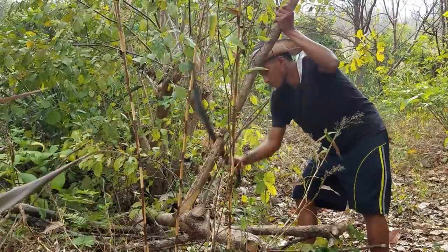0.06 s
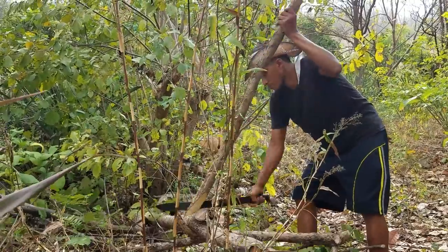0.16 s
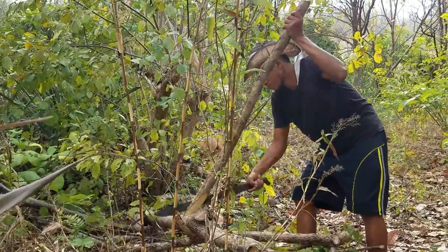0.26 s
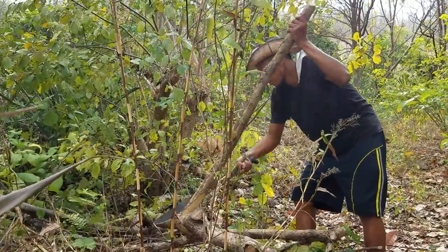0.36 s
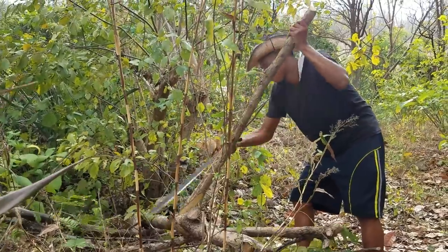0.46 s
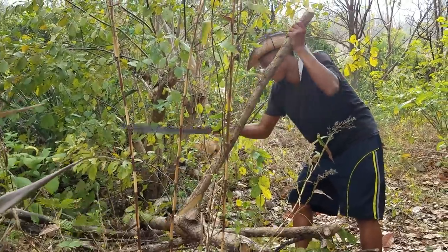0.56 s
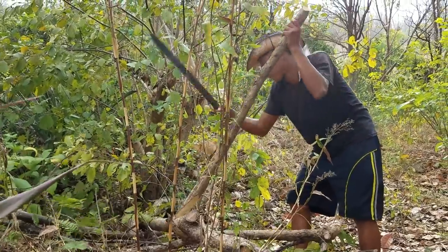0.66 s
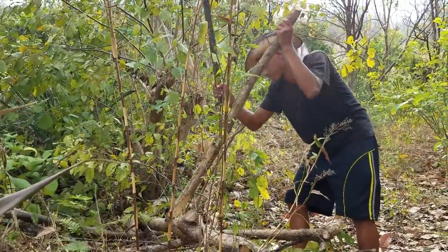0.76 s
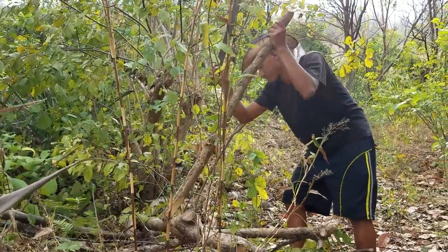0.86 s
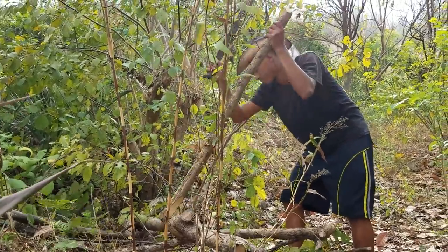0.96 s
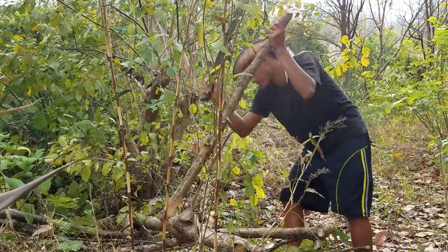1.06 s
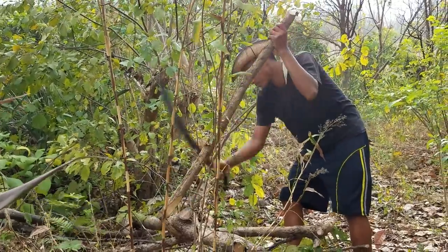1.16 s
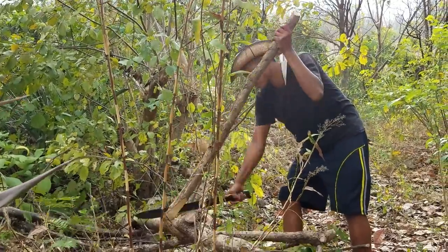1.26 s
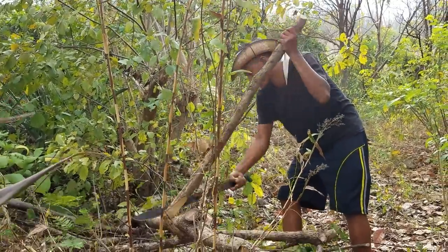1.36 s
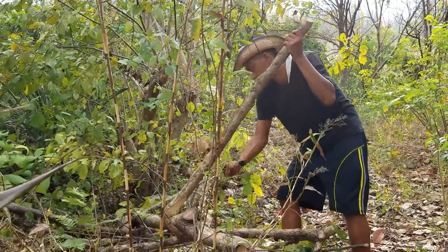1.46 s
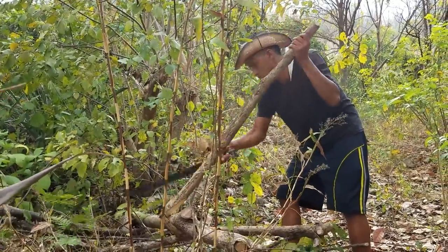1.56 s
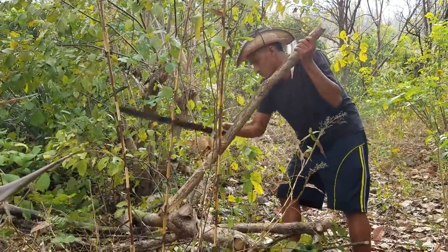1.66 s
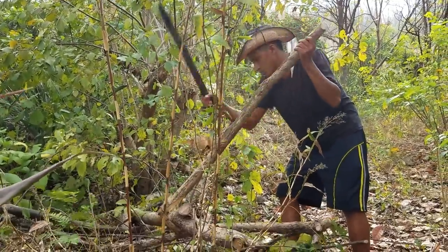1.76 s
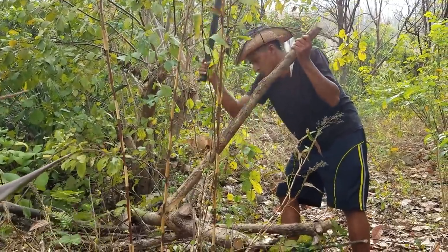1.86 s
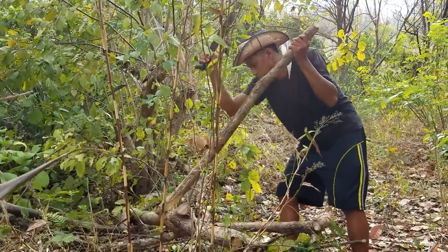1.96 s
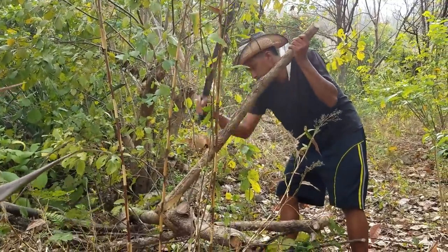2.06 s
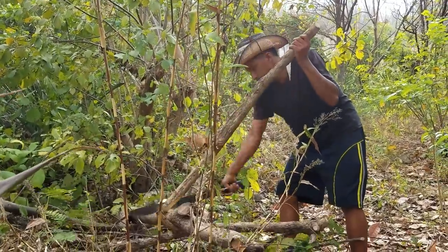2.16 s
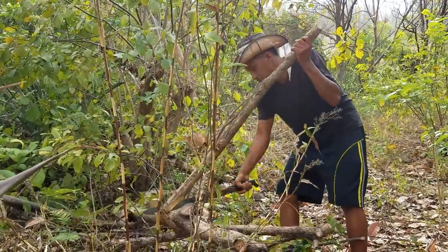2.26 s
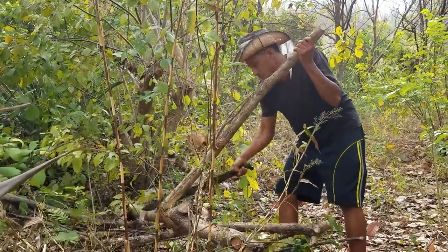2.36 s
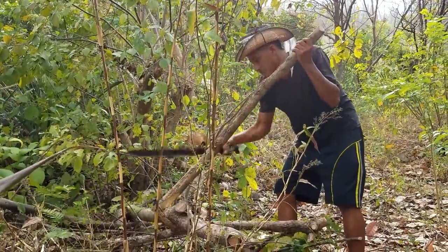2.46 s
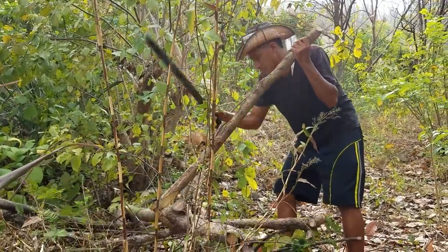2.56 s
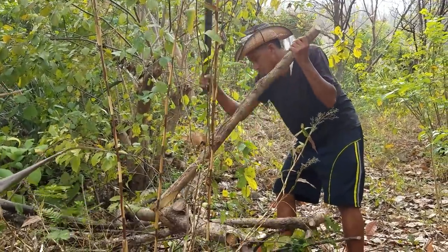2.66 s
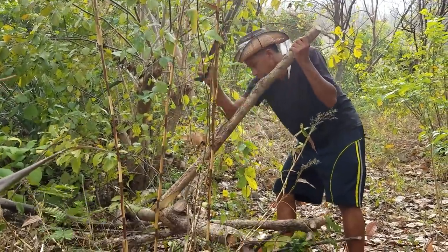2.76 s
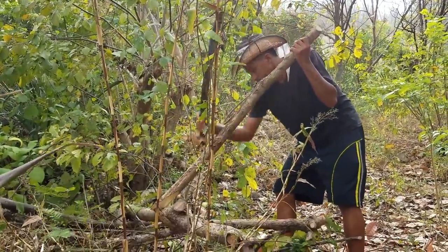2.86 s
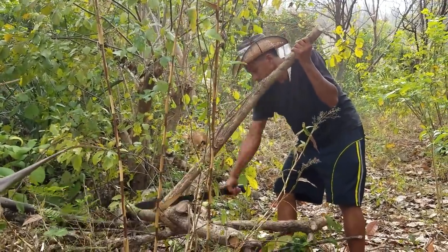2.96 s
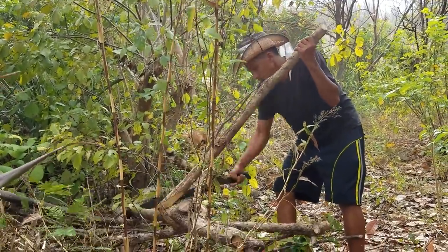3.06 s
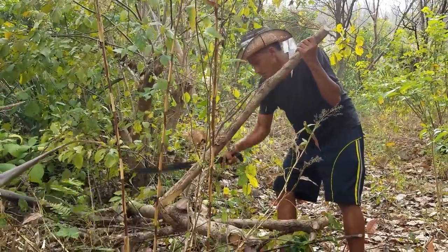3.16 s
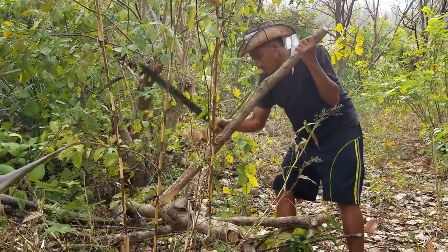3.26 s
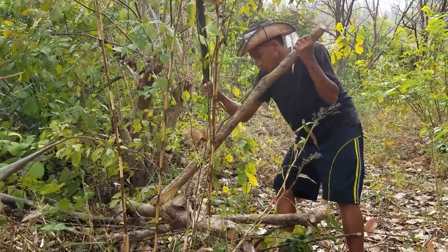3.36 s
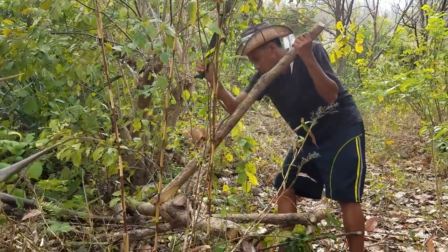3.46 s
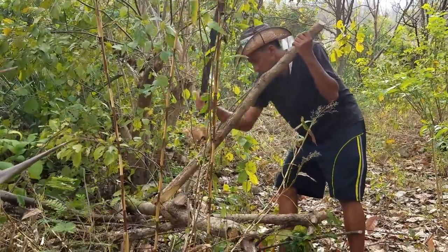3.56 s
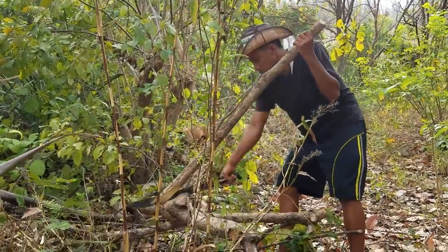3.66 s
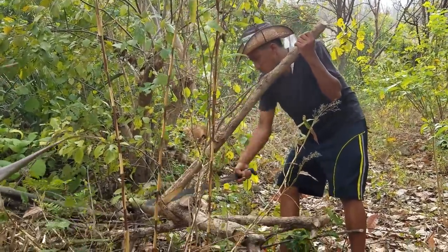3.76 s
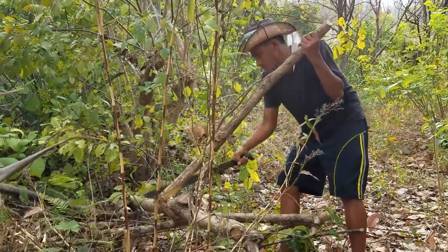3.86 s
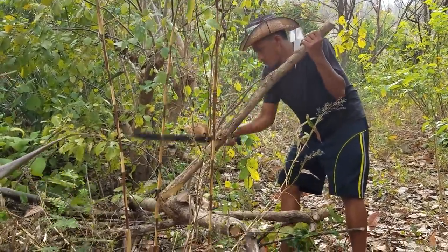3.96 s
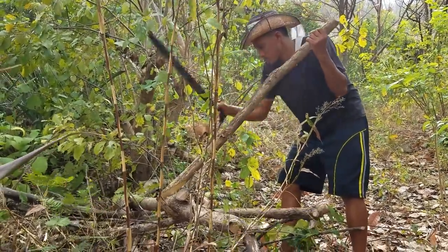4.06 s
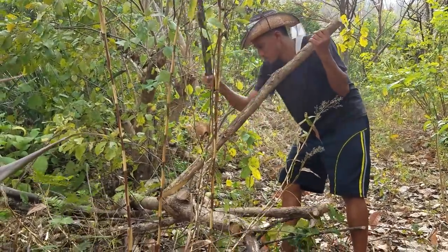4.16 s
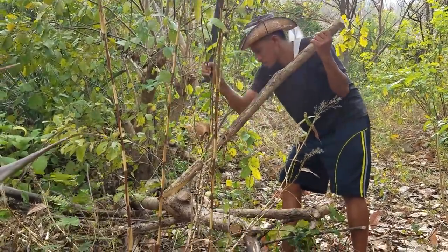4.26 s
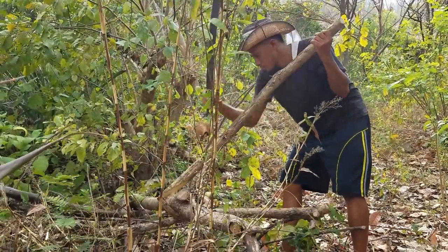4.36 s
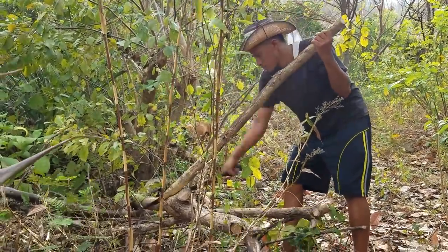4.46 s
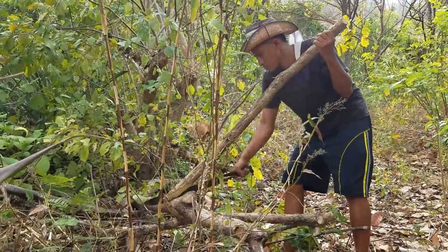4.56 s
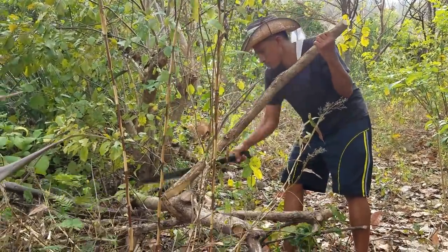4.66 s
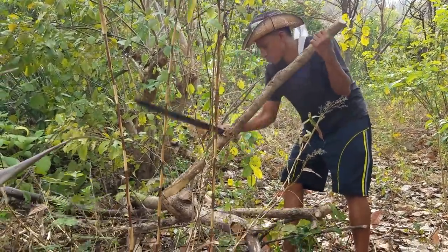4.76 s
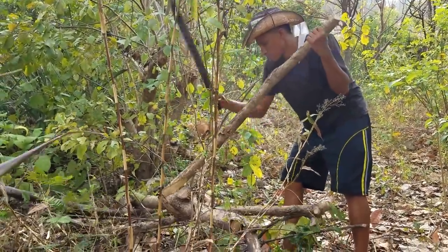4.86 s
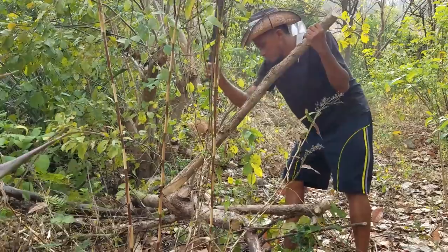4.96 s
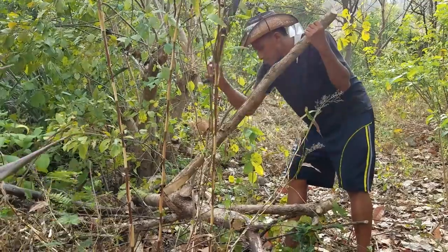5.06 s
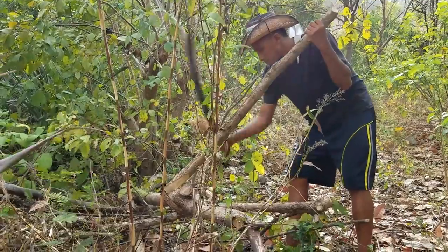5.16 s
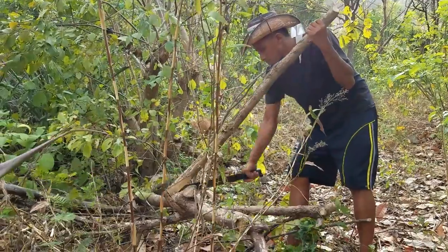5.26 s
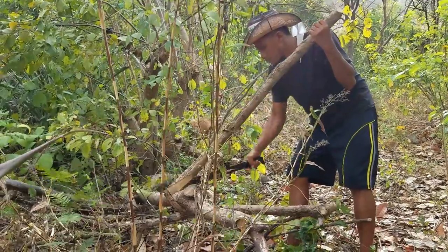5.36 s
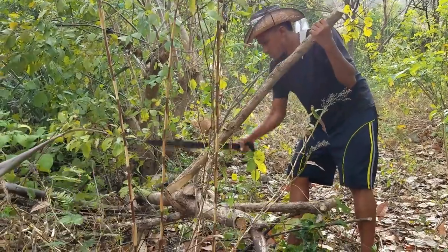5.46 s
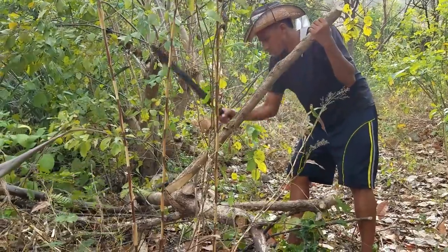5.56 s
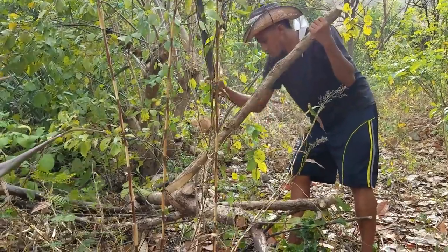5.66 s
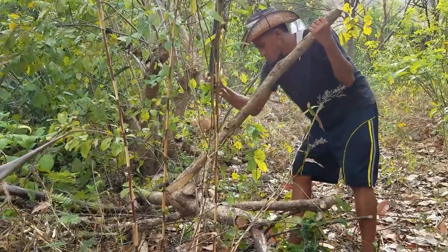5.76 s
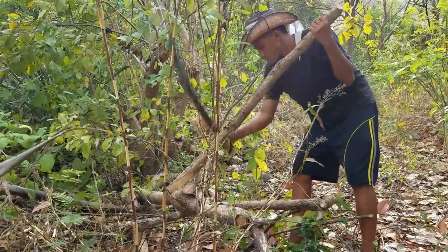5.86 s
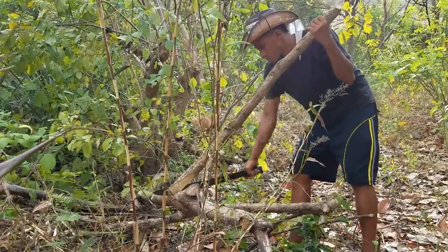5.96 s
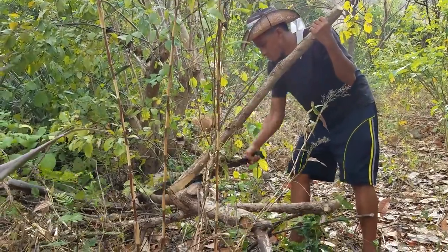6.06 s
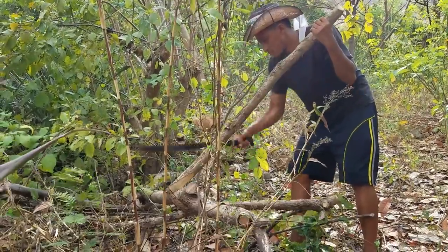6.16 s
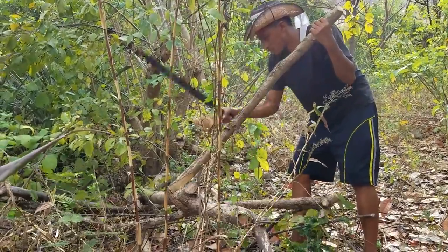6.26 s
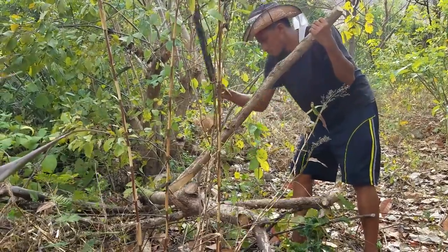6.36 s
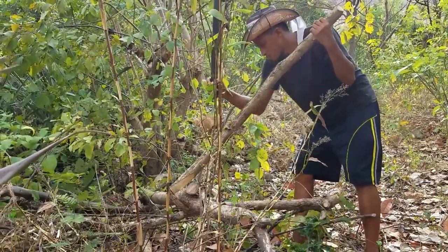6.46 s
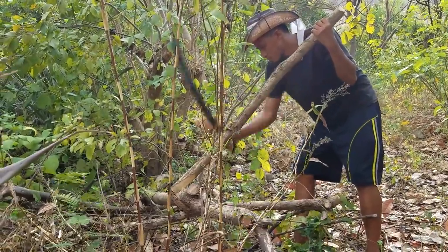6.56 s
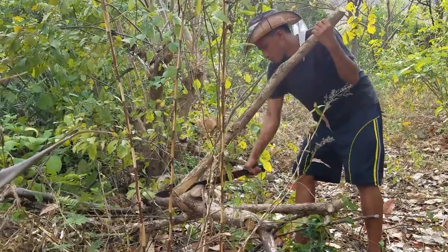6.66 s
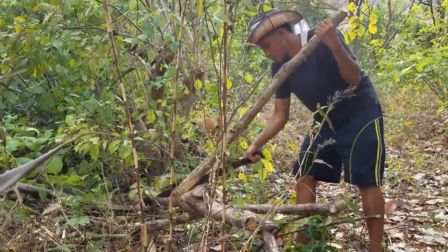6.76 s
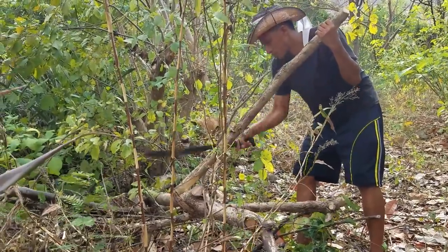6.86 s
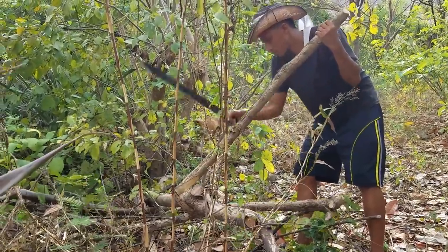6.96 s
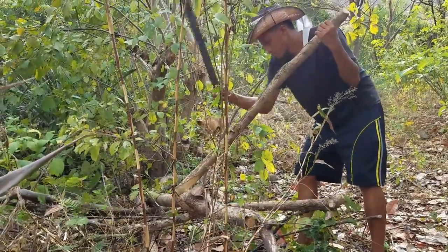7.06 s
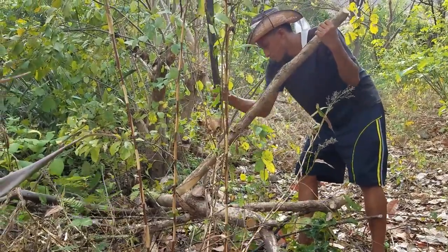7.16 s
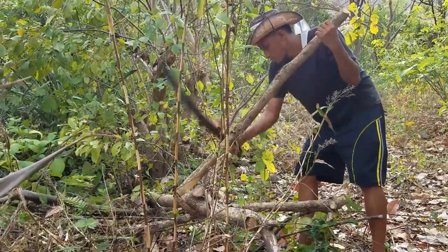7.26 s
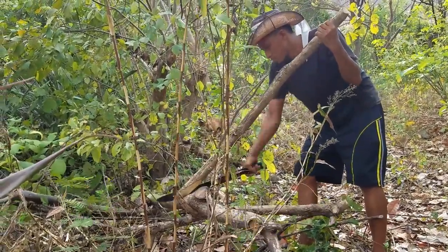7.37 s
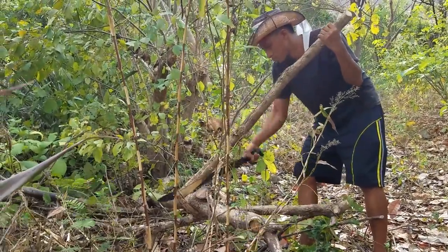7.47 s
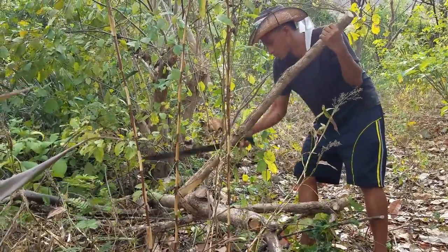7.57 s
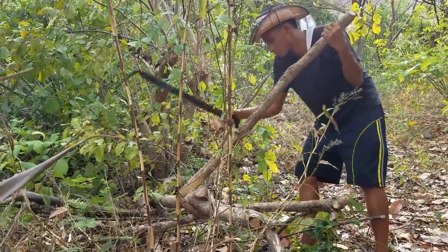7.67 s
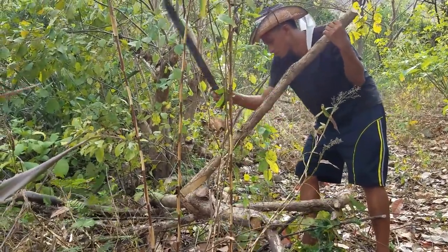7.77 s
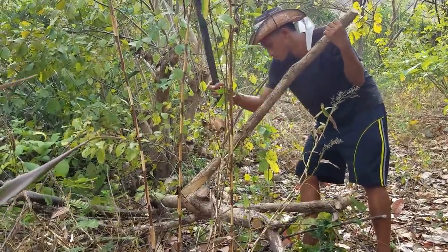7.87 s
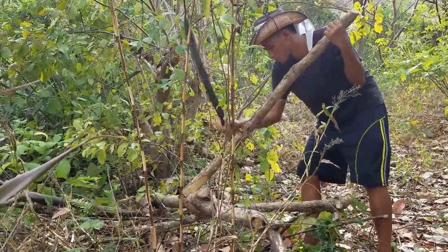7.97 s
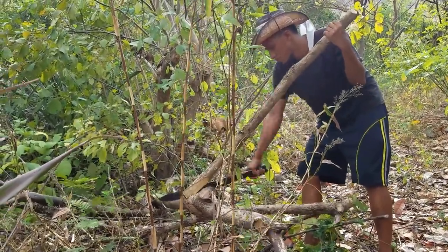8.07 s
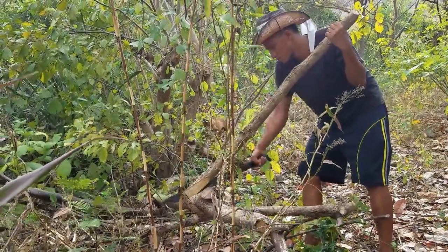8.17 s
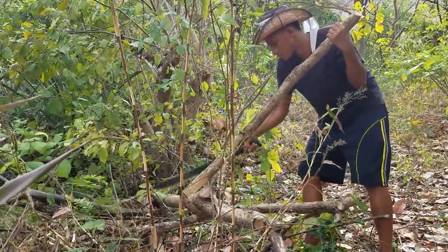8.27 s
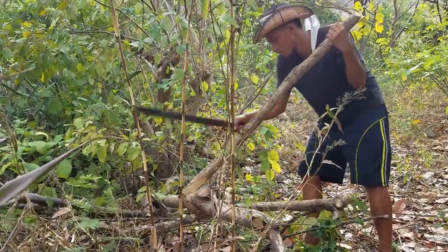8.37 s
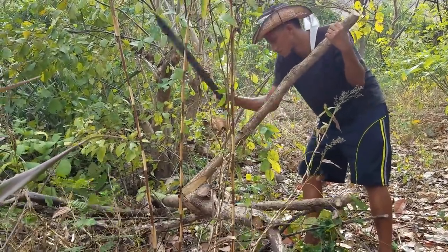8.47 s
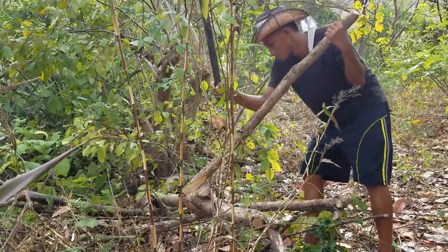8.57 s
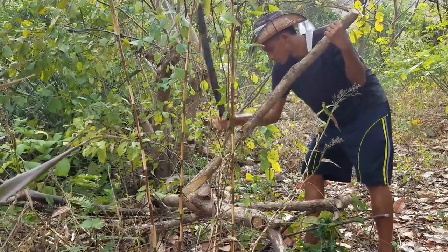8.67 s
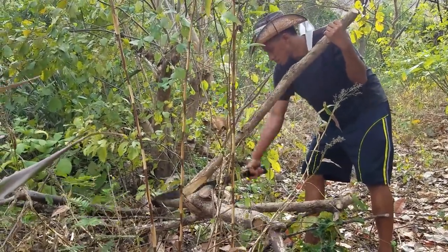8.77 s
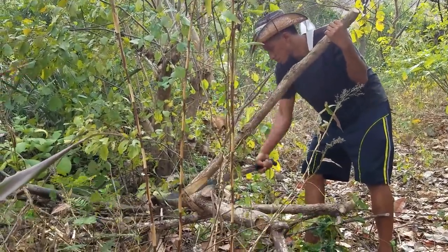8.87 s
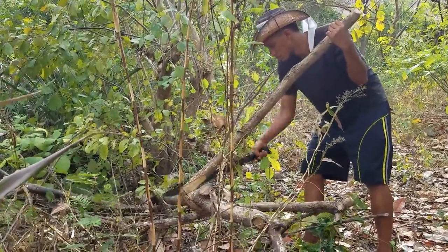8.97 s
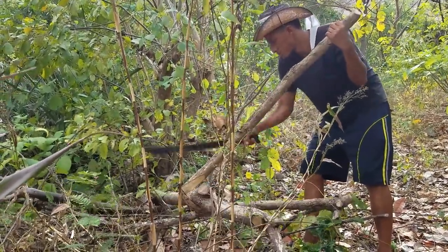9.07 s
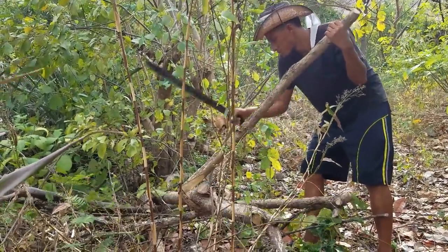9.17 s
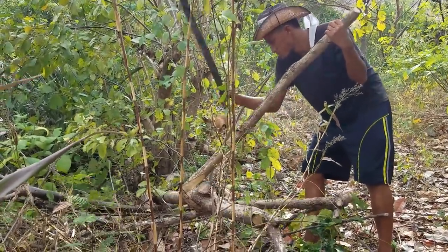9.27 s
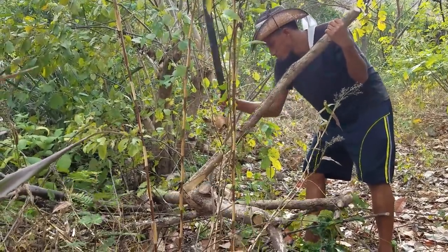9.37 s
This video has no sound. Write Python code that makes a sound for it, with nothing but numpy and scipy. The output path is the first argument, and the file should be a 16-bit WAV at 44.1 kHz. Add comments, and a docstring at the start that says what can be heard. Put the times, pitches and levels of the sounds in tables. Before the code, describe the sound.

Outdoors in dry woodland, a machete chops a leaning wooden pole twelve times, a little over once a second at first, then faster. Each close blow is a sharp, fibrous crack with a short hollow knock. Splinters snap and chips tick into dry leaves; the blade faintly rings a few times. A soft dove coos throughout, and small birds whistle in the second half over a quiet hush and soft forest echoes.

```python
"""Machete carving a pole in woodland

Twelve blows point a leaning wooden pole: each grazes, tears fibres (shaped noise) and rings the pole (sine modes).
Splinters crack, chips drop into dry leaves (noise bursts, random clicks) and the blade rings at three touches.
A dove and two songbirds call (gliding sines) over a steady hush and faint rumble (filtered noise).
Stems scatter the sound; far trees return a noise tail with two soft echoes.
"""
import sys
import numpy as np
from scipy import signal
from scipy.io import wavfile

SR = 44100
rng = np.random.default_rng(int(sys.argv[2]) if len(sys.argv) > 2 else 0)


def master_out(mix):
    """Clip the mix to full scale and print it as 16-bit PCM to the path in sys.argv[1]."""
    frames = np.transpose(np.atleast_2d(mix))
    ceiling = np.clip(frames, -1, 1)
    pcm = np.round(ceiling * 32767).astype(np.int16)
    wavfile.write(sys.argv[1], SR, pcm)


N = 414981

# blows: (time [s], time in wood [s], graze before bite [s], knock [Hz], strength [dB],
# brightness [dB/octave], hollow ring [dB], leaves shaken [dB])
CHOPS = [(0.0935, 0.0043, 0.00096, 1413, 1.5, 0, -6.5, -52), (1.1926, .0063, .001, 1520, 1, 0.35, -4, -50),
         (2.1474, 0.0058, .0015, 1270, 2, -.3, -2, -52.5), (2.9327, 0.0068, .001, 1142, 0, 0.56, 2, -56.5),
         (3.6529, .014, .0025, 1172, 1, -1.24, 8, -58), (4.4574, 0.0038, .0005, 1270, 1.5, 1, -1.5, -71),
         (5.2069, 0.006, .013, 1284, -1, -0.67, 2.5, -69),
         (5.9054, .02, 0.008, 1294, -3.5, -0.56, -2, -59.5), (6.604, .011, .002, 1200, -0.9, 0, -1.5, -70),
         (7.2976, .0098, .001, 1208, -.5, 0, -2, -62), (8.035, 0.0096, .0071, 1316, -6.5, -0.45, 1, -60),
         (8.742, .012, 0.0075, 1150, -5.5, 0, 0.5, -54)]
# pole bending modes, before detuning: (frequency [Hz], level [dB], t60 [s])
POLE_MODES = [(84, -47.5, 0.076), (113.4, -45.5, 0.22), (127.4, -46, 0.1), (174.4, -42.5, 0.15),
              (208.4, -36, .2), (235.5, -39.5, 0.32), (282, -34.5, 0.182), (342.4, -31.5, 0.18),
              (372, -32.5, 0.27), (421.6, -30.5, 0.15), (523.6, -27, 0.14), (574.8, -22, 0.13),
              (683.7, -22.5, 0.15), (752, -22, 0.075), (834, -25.5, 0.11), (1131, -34.5, 0.13),
              (1190, -28.5, 0.19), (1250, -30.5, .09), (1357, -28, .09), (1663, -32, 0.12),
              (2115, -28.5, 0.06), (2468, -29, 0.065), (3192, -26, 0.035)]
# tearing fibres: (frequency [Hz], level [dB])
TEAR_SPECTRUM = [(40, -33), (70, -25), (150, -19.5), (300, -13), (700, -7), (950, -14.5), (1400, -4.5),
                 (2200, -6.5), (3200, -8.5), (4800, -17), (7800, -21.5), (9200, -15), (12000, -20.5),
                 (16000, -28.5)]
# decay of the splitting wood: (frequency [Hz], t60 [s])
TEAR_DECAY = [(70, 0.15), (300, 0.32), (1000, 0.15), (3000, 0.076), (12000, 0.017)]
# loudest chips and twigs landing: (time [s], level [dB], clack [Hz], slide through leaves [s])
CHIP_LANDINGS = [(0.347, -25, 2920, 0.00013), (0.37, -32, 3540, 0.00047), (.412, -38.5, 1500, 0.019),
                 (.471, -30.5, 2590, 0.00069), (1.278, -23, 1900, 0.00065), (1.367, -28.5, 3170, 0.016),
                 (1.553, -39.5, 4700, 0.0044), (1.66, -47, 2780, 0.051), (1.76, -33.5, 1980, 0),
                 (1.972, -41, 1190, 0.003), (2.466, -33.5, 4000, 0), (3.146, -35.5, 2220, 0.00074),
                 (3.827, -33.5, 3700, 0), (3.909, -34, 1800, 0), (5.345, -27.5, 1224, 0.00063),
                 (6.82, -36, 2050, 0), (7.0245, -40, 2720, 0), (7.088, -36.5, 1890, 0),
                 (7.6445, -41, 4200, 0), (8.146, -31.5, 2210, 0.00063), (9.092, -31, 2000, 0),
                 (9.142, -28.5, 3450, 0)]
# glancing touches of the blade: (time [s], level [dB], favoured frequency [Hz])
BLADE_TOUCHES = [(.43, -47.5, 5140), (1.39, -51.5, 5400), (8.04, -39.5, 5700)]
# steel blade modes: (frequency [Hz], level re touch [dB], t60 [s])
BLADE_MODES = [(4549, -6, 0.47), (5187, 0.5, 0.33), (5663, -3, 0.55), (6083, -13, 0.31), (6460, -11, 0.35)]
# whistle harmonics: (multiple of fundamental, level [dB])
WHISTLE_HARMONICS = [(1, 2), (2, -3.5), (3, -2.5)]
# near scatter off foliage: (frequency [Hz], level re source [dB])
FOLIAGE_SCATTER = [(100, -20.5), (300, -14), (700, -4.5), (1500, -3.5), (3000, -3), (6000, -1.5),
                   (14000, 5.5)]
# near scatter off stems: (frequency [Hz], level re source [dB])
STEM_SCATTER = [(100, -17), (300, -20), (700, -11), (1500, -11.5), (3000, -6), (6000, -1.5), (14000, 2)]
# far forest tail: (frequency [Hz], relative level [dB])
FOREST_TAIL = [(100, -19.5), (600, -22.5), (1400, -15.5), (3000, -16.5), (6000, -13.5), (14000, -5)]
# colour of the far echoes: (frequency [Hz], relative level [dB])
ECHO_COLOUR = [(100, -12.5), (600, -14), (1500, -5.5), (3000, -5.5), (6000, -10), (14000, -16)]
# echoes from stands of trees: (delay [s], spread [s], level before colour [dB])
ECHOES = [(.345, 0.02, -25.5), (0.493, 0.021, -29)]
# channel correlation of diffuse sound, before any share: (frequency [Hz], correlation [0-1])
LIKENESS = [(100, 0.67), (500, 0.8), (1100, 0.25), (2000, 0.23), (3200, 0), (5000, 0), (16000, 0.03)]
# woodland air: (frequency [Hz], gain on white noise [dB])
AIR_SPECTRUM = [(25, -66), (60, -58), (130, -68), (320, -48), (700, -54.5), (1300, -55.5), (2200, -56),
                (4000, -62.5), (7500, -79), (9500, -61), (15500, -67.5)]
# deep bass over time, thinner after the fourth blow: (time [s], level [dB])
BASS = [(0, 9.5), (1.2, 13), (2.95, 13), (3.6, -2.5), (9.41, -3)]
# dove calls: (time [s], level [dB])
DOVE_CALLS = [(-.18, -62.5), (2.04, -58.5), (4.22, -61), (6.32, -60.5), (8.53, -59.5)]
# arch of each coo: (first [Hz], middle [Hz], last [Hz])
COO_HZ = (767, 781, 725)
# songbird notes before stretching: (time in phrase [s], length [s], first [Hz], middle [Hz], last [Hz], level [dB])
PHRASE = [(0, 0.079, 2080, 2430, 2430, -3), (.04, .09, 2580, 2087, 1600, 0.5),
          (0.371, 0.0575, 2420, 2840, 2780, 0.5), (.46, .085, 3220, 2580, 2190, -3),
          (0.591, .065, 2940, 2610, 2150, -6), (.695, .07, 2180, 1990, 1780, -9.5),
          (0.767, .068, 1770, 1610, 1380, -8), (1.072, .066, 3380, 2830, 2160, 2.5)]
# renditions of the phrase: (time [s], time stretch [ratio], level [dB])
SONGS = [(5.78, 0.95, -52.5), (7.14, 0.95, -51), (8.54, 1.0, -46.5)]

TIME_S = np.arange(N) / SR
EDGES_HZ = np.geomspace(22, 17000, 25)
# filter bank: (centre [Hz], filter sections)
BANK = [(np.sqrt(lo * hi), signal.butter(2, [lo, hi], "band", fs=SR, output="sos"))
        for lo, hi in zip(EDGES_HZ, EDGES_HZ[1:])]

GRAZE_DB = -9.5  # re bite
HOLLOW_HZ, HOLLOW_OCTAVES = 681, 0.53
BOOM_HZ, PIVOT_HZ = 110.2, 1294  # brightness tilts about the pivot
SUB_HZ, SUB_FOLLOWS, SUB_DB = 55, 1.8, -3  # sub swings wider than the boom
CRACKS_PER_BLOW, CRACK_FROM_S, CRACK_TO_S = 3, .04, .13
CRACK_DB, CRACK_FADE_DB_PER_S, CRACK_HZ, CRACK_SPREAD_OCTAVES = -17, 131, 2490, 0.54
BITS_PER_BLOW, FALL_S, FALL_SPREAD_S = 4, .36, .13
BIT_DB, BIT_SPREAD_DB, BIT_HZ, BIT_SPREAD_OCTAVES = -45.5, 3.5, 3980, .5
STIR_PEAK_S, STIR_RISE_S, SETTLE_T60_S, RUSTLE_DB = 0.29, 0.16, 1.44, -71.5
COO_S, SECOND_COO_AFTER_S, SECOND_COO_S, SECOND_COO_DB = .27, .475, .19, -5
WHISTLE_AT_S, WHISTLE_S, WHISTLE_DB = 4.95, 0.23, -64
WHISTLE_HZ, WHISTLE_DROP_HZ, WHISTLE_DROP_S, WHISTLE_SAG_HZ_PER_S = 3280, 1400, 0.055, 2700


def from_db(db):
    """Decibels to amplitude gain."""
    return 10 ** (np.asarray(db) / 20)


def at_hz(points, hz):
    """Interpolate a table on a log-frequency axis."""
    freqs, values = np.transpose(points)
    return np.interp(np.log(hz), np.log(freqs), values)


def bass_db(time_s):
    """Deep-bass level at a given time."""
    return np.interp(time_s, *np.transpose(BASS))


def dying(t, t60_s):
    """Full until t = 0, then exponential decay of 60 dB per t60."""
    return np.exp(-np.log(1000) * np.maximum(t, 0) / t60_s)


def seconds(length_s):
    """Time axis from zero."""
    return np.arange(int(length_s * SR)) / SR


def unit(shape):
    """Scale to energy 1."""
    return shape / np.sqrt(np.sum(shape ** 2))


def band_pass(low_hz, high_hz, sound):
    """Second-order Butterworth band-pass."""
    return signal.sosfilt(signal.butter(2, [low_hz, high_hz], "band", fs=SR, output="sos"), sound)


def high_pass(low_hz, sound):
    """Second-order Butterworth high-pass."""
    return signal.sosfilt(signal.butter(2, low_hz, "high", fs=SR, output="sos"), sound)


def add(out, time_s, sound):
    """Mix a sound in at a time, trimmed to the output."""
    at = int(round(time_s * SR))
    first, last = max(at, 0), min(at + len(sound), len(out))
    out[first:last] += sound[first - at:last - at]


def bands(size):
    """White noise split into bands, as (Hz, noise); neighbours use different noise."""
    white = rng.standard_normal((2, size + SR // 10))  # the extra 0.1 s lets the filters settle
    return [(hz, signal.sosfilt(sos, white[k % 2])[-size:]) for k, (hz, sos) in enumerate(BANK)]


def stereo_bands(size, likeness_share=1):
    """Diffuse stereo noise bands; mid and side mix to the tabled correlation times its share."""
    for (hz, mid), (_, side) in zip(bands(size), bands(size)):
        alike = np.clip(likeness_share * at_hz(LIKENESS, hz), -1, 1)
        mid_part = np.sqrt((1 + alike) / 2) * mid
        side_part = np.sqrt((1 - alike) / 2) * side * [[1], [-1]]
        yield hz, mid_part + side_part


def ragged(t, per_s, spread_db):
    """Random gain with per_s knots a second, mean power 1."""
    steps = from_db(spread_db * rng.standard_normal(len(t)))
    gain = np.interp(t * per_s, np.arange(len(t)), steps)
    return gain / np.sqrt(np.mean(gain ** 2))


def air(level_db=0.0, likeness_share=0.44):
    """Steady woodland hush: diffuse noise shaped by band."""
    hush = sum(noise * from_db(at_hz(AIR_SPECTRUM, hz)) for hz, noise in stereo_bands(N, likeness_share))
    return from_db(level_db) * hush


def rumble(low_hz=30, high_hz=160, level_db=-82, follows=1.17):
    """Faint, lumpy low noise whose level follows the deep bass."""
    noise = band_pass(low_hz, high_hz, rng.standard_normal(N))
    level = from_db(level_db + follows * bass_db(TIME_S))
    return noise / np.std(noise) * ragged(TIME_S, per_s=20, spread_db=2.6) * level


def notes(table, waver):
    """Pure tones arching through three pitches, with a half-sine swell and random waver."""
    out = np.zeros(N)
    for time_s, length_s, *pitches_hz, db in table:
        u = seconds(length_s) / length_s
        wobble = np.interp(u, np.linspace(0, 1, num=12), rng.standard_normal(size=12))
        arch_hz = np.polyval(np.polyfit([0, .5, 1], pitches_hz, 2), u)
        phase = 2 * np.pi * np.cumsum(arch_hz * (1 + waver * wobble)) / SR
        add(out, time_s, from_db(db) * np.sin(np.pi * u) * np.sin(phase))
    return out


def dove():
    """Each call is a long coo, then a shorter, softer one on the same pitch arch."""
    first = [(s, COO_S, *COO_HZ, db) for s, db in DOVE_CALLS]
    second = [(s + SECOND_COO_AFTER_S, SECOND_COO_S, *COO_HZ, db + SECOND_COO_DB) for s, db in DOVE_CALLS]
    return notes(first + second, waver=0.0042)


def blow_colour(time_s, strength_db, brightness_db, hollow_db):
    """Blow spectrum as (Hz, dB): sub and boom, then a tilt with a hollow-ring hump."""
    hz = np.geomspace(280, 9000, 21)
    hump = np.exp(-.5 * (np.log2(hz / HOLLOW_HZ) / HOLLOW_OCTAVES) ** 2)
    db = strength_db + brightness_db * np.log2(hz / PIVOT_HZ) + hollow_db * hump
    low_db = bass_db(time_s)
    return [(SUB_HZ, SUB_DB + SUB_FOLLOWS * low_db), (BOOM_HZ, low_db), *zip(hz, db)]


def tearing(t, bite_s, graze_s, graze_db, colour, rise_cycles=.8, sag_db=5.0):
    """Fibres snap as ragged noise while the edge is in the wood; lows build up more slowly."""
    inside = np.maximum(t, 0)
    force = from_db(-sag_db * np.minimum(inside / bite_s, 1))  # blade slows as it sinks in
    out = np.zeros(len(t))
    for hz, noise in bands(len(t)):
        decay = dying(t - bite_s, at_hz(TEAR_DECAY, hz))
        cut = force * (1 - np.exp(-inside * hz / rise_cycles)) * decay
        skim = from_db(graze_db) * (1 - np.exp(-(t + graze_s) * hz / rise_cycles)) * (t < 0)
        out += noise * (cut + skim) * from_db(at_hz(TEAR_SPECTRUM, hz) + at_hz(colour, hz))
    return out * ragged(t, per_s=1800, spread_db=2.0)


def pole(t, bite_s, knock_hz, colour, knock_db=-23.0, knock_t60_s=0.056, rise_cycles=2.8,
         spread_db=2.0, push_share=0.56, detune=.012):
    """Bending modes fill within a few cycles, varied per blow; the struck spot adds a knock."""
    inside, out = np.maximum(t, 0), np.zeros(len(t))
    for hz, db, t60_s in POLE_MODES + [(knock_hz, knock_db, knock_t60_s)]:
        strength = from_db(db + at_hz(colour, hz) + spread_db * rng.standard_normal())
        swell = (1 - np.exp(-inside * hz / rise_cycles)) * dying(t - push_share * bite_s, t60_s)
        mode_hz = hz * (1 + detune * rng.standard_normal())
        out += strength * swell * np.sin(2 * np.pi * (mode_hz * inside + rng.random()))
    return out


def chops(tear_db=-0.68, pole_db=-1.0):
    """Each blow sums tearing wood and ringing pole, coloured alike."""
    out, span = np.zeros(N), seconds(.5)
    for time_s, bite_s, graze_s, knock_hz, strength_db, brightness_db, hollow_db, _ in CHOPS:
        t = span - graze_s  # zero at the bite
        colour = blow_colour(time_s, strength_db, brightness_db, hollow_db)
        torn = from_db(tear_db) * tearing(t, bite_s, graze_s, GRAZE_DB, colour)
        rung = from_db(pole_db) * pole(t, bite_s, knock_hz, colour)
        add(out, time_s - graze_s, torn + rung)
    return out


def splinters():
    """Late cracks of the opening cut, weaker when later: (s, dB, Hz, no slide)."""
    blows = [(s, strength_db) for s, _, _, _, strength_db, *_ in CHOPS for _ in range(CRACKS_PER_BLOW)]
    after_s = rng.uniform(CRACK_FROM_S, CRACK_TO_S, len(blows))
    high = rng.uniform(-1, 1, len(blows))
    return [(s + late_s, CRACK_DB + db - CRACK_FADE_DB_PER_S * late_s, CRACK_HZ * 2 ** (CRACK_SPREAD_OCTAVES * up), 0)
            for (s, db), late_s, up in zip(blows, after_s, high)]


def small_bits():
    """Bits of bark thrown into the leaves, scattered about each blow's fall time: (s, dB, Hz, no slide)."""
    blows_s = np.repeat([s for s, *_ in CHOPS], BITS_PER_BLOW)
    chance = np.clip(rng.standard_normal((len(blows_s), 3)), -2, 2)
    return [(s + FALL_S + FALL_SPREAD_S * late, BIT_DB + BIT_SPREAD_DB * loud,
             BIT_HZ * 2 ** (BIT_SPREAD_OCTAVES * high), 0)
            for s, (late, loud, high) in zip(blows_s, chance)]


def chips(t60_s=0.013, width=0.76, clack_db=2.5, crisp_db=-6.5, skitter_db=-20.5, skitter_t60_s=.08, twig_hz=3000):
    """Noise bursts give clack, leaf crunch and skitter; low pitches last longer and duller. Cracks share this."""
    out, t = np.zeros(N), seconds(0.23)
    for time_s, db, hz, slide_s in CHIP_LANDINGS + small_bits() + splinters():
        smallness = hz / twig_hz
        skitter = from_db(skitter_db) * dying(t, skitter_t60_s) * ragged(t, per_s=350, spread_db=6.0)
        burst = rng.standard_normal(len(t)) * (dying(t - slide_s, t60_s / smallness) + skitter)
        clack = band_pass(hz / (1 + width / 2), hz * (1 + width / 2), burst)
        crunch = from_db(crisp_db) * min(smallness, 1) ** 2 * burst
        add(out, time_s, from_db(db) * (from_db(clack_db) * clack + crunch))
    return out


def stirring():
    """Leaf motion: a delayed swell after each blow, power-summed over a faint rustle."""
    times = TIME_S[::100]
    power = from_db(RUSTLE_DB) ** 2
    for time_s, *_, shaken_db in CHOPS:
        t = times - time_s - STIR_PEAK_S
        swell = np.exp(-.5 * (np.minimum(t, 0) / STIR_RISE_S) ** 2)
        power = power + (from_db(shaken_db) * swell * dying(t, SETTLE_T60_S)) ** 2
    return np.interp(TIME_S, times, np.sqrt(power))


def leaves(per_s=1100, size_db=3.5, low_hz=600, soft_hz=2000, crisp_gain=0.11, level_db=-1.0):
    """Dry leaves: clumps of random clicks of uneven size, softened by a low-pass."""
    hits = (rng.random(N) < per_s / SR) * rng.choice([-1, 1], N)
    sizes = from_db(size_db * np.minimum(rng.exponential(1, N), 5))
    clicks = high_pass(low_hz, hits * sizes)
    soft = signal.sosfilt(signal.butter(1, soft_hz, fs=SR, output="sos"), clicks)
    crackle = crisp_gain * clicks + soft
    level = from_db(level_db) * stirring() * ragged(TIME_S, per_s=71, spread_db=4.5)
    return crackle / np.std(crackle) * level


def blade(spread_db=1.0, aside_db_per_octave=25):
    """Thin steel rings in decaying modes, strongest near the pitch each touch favours."""
    out, t = np.zeros(N), seconds(1)
    for time_s, db, favoured_hz in BLADE_TOUCHES:
        for hz, mode_db, t60_s in BLADE_MODES:
            aside_db = aside_db_per_octave * abs(np.log2(hz / favoured_hz))
            level_db = db + mode_db - aside_db + spread_db * rng.standard_normal()
            add(out, time_s, from_db(level_db) * dying(t, t60_s) * np.sin(2 * np.pi * hz * t))
    return out


def whistle(edge_s=0.0098, fade_t60_s=2.2, throat_hz=9800):
    """A second bird's whistle drops fast, then sags; the throat damps the highest harmonics."""
    out, t = np.zeros(N), seconds(WHISTLE_S)
    hz = WHISTLE_HZ + WHISTLE_DROP_HZ * np.exp(-t / WHISTLE_DROP_S) - WHISTLE_SAG_HZ_PER_S * t
    phase = 2 * np.pi * np.cumsum(hz) / SR
    tone = sum(from_db(db) / (1 + (k * hz / throat_hz) ** 10) * np.sin(round(k) * phase)
               for k, db in WHISTLE_HARMONICS)
    edges = np.minimum(np.minimum(t, WHISTLE_S - t) / edge_s, 1)
    level = edges * dying(t, fade_t60_s) * ragged(t, per_s=70, spread_db=3.0)
    add(out, WHISTLE_AT_S, from_db(WHISTLE_DB) * level * tone)
    return out


def songbird():
    """One phrase of slurred notes, repeated with its own time stretch and level."""
    return notes([(start_s + stretch * s, length_s, *pitches_hz, song_db + db)
                  for start_s, stretch, song_db in SONGS
                  for s, length_s, *pitches_hz, db in PHRASE], waver=0.015)


def woodland(foliage_t60_s=0.037, stems_t60_s=0.25, stems_rise_s=0.0069):
    """Near-scatter impulse response: foliage at once, stems building up soon after."""
    t, out = seconds(.5), 0
    foliage = unit(dying(t, foliage_t60_s))
    stems = unit(dying(t, stems_t60_s) * (1 - np.exp(-t / stems_rise_s)))
    for hz, noise in stereo_bands(len(t)):
        off_foliage = from_db(at_hz(FOLIAGE_SCATTER, hz)) * foliage
        off_stems = from_db(at_hz(STEM_SCATTER, hz)) * stems
        out = out + noise * np.hypot(off_foliage, off_stems)
    return out


def heard(source, scatter, pan_db, direct_db, lag_s):
    """Direct sound with a level and time difference between channels, plus convolved scatter."""
    left = source * from_db(pan_db / 2)
    right = np.interp(TIME_S - lag_s, TIME_S, source) * from_db(-pan_db / 2)
    scattered = signal.fftconvolve(source[None], scatter, axes=1)[:, :N]
    return from_db(direct_db) * np.array([left, right]) + scattered


def forest(source, t60_s=0.77, rise_s=0.015):
    """Far trunks return band energy as noise: a toneless tail and two soft echoes."""
    t, out = seconds(2), 0
    tail = unit(dying(t, t60_s) * (1 - np.exp(-t / rise_s)))
    echoes = sum(from_db(db) * unit(np.exp(-.5 * ((t - delay_s) / spread_s) ** 2))
                 for delay_s, spread_s, db in ECHOES)
    for (hz, noise), (_, sos) in zip(stereo_bands(N), BANK):
        tail_power = (from_db(at_hz(FOREST_TAIL, hz)) * tail) ** 2
        echo_power = (from_db(at_hz(ECHO_COLOUR, hz)) * echoes) ** 2
        power = signal.fftconvolve(signal.sosfilt(sos, source) ** 2, tail_power + echo_power)[:N]
        out = out + np.sqrt(np.abs(power)) * noise / np.std(noise)
    return out


def scene():
    """Near path for work, blade, dove and whistle; weak direct songbird; forest returns work and song."""
    scatter = woodland()
    work = chops() + chips() + leaves()
    song = songbird()
    tones = blade() + whistle() + dove()
    near = heard(work + tones, scatter, pan_db=-2.0, direct_db=0.5, lag_s=.000035)
    far = from_db(3.5) * heard(song, scatter, pan_db=7.0, direct_db=-8.0, lag_s=0.0)
    returned = from_db(-1.0) * forest(work + from_db(14.5) * song)
    return near + far + returned + air() + rumble()


def record(dry):
    """The microphone thins the deep bass; peaks are rounded and the top is cut."""
    ceiling, low_cut_hz, cutoff_hz = 1.1, 48, 16000
    thinned = high_pass(low_cut_hz, dry)
    rounded = ceiling * np.tanh(thinned / ceiling)
    return signal.sosfilt(signal.ellip(10, .1, 80, cutoff_hz, fs=SR, output="sos"), rounded)


dry = scene()
out = record(dry)
master_out(out)
```